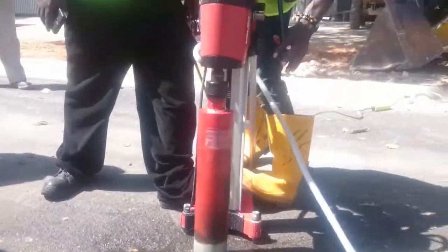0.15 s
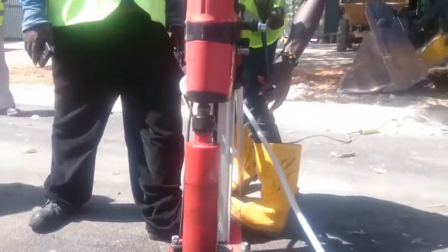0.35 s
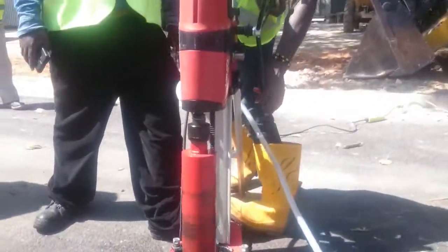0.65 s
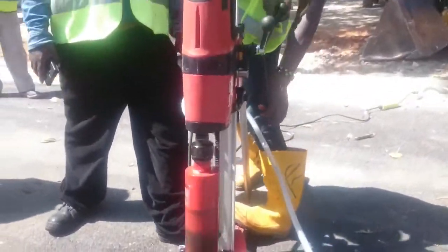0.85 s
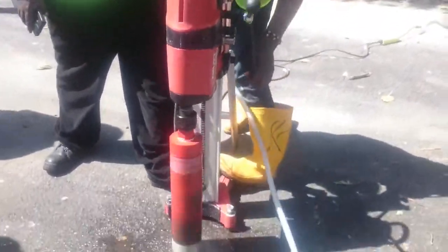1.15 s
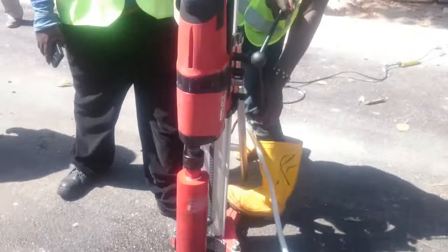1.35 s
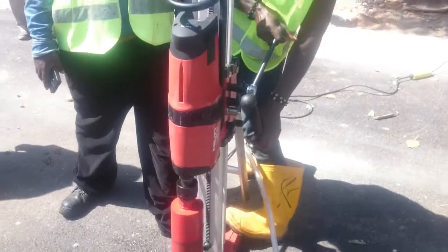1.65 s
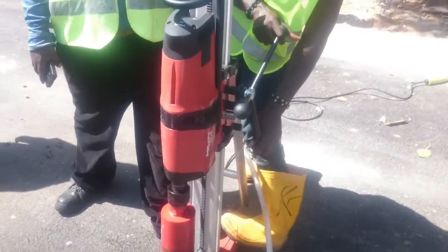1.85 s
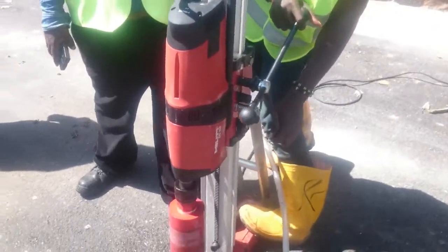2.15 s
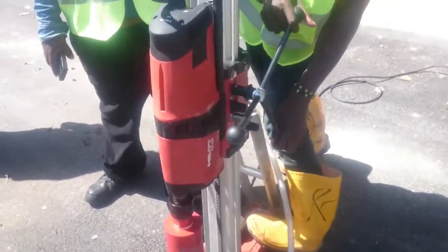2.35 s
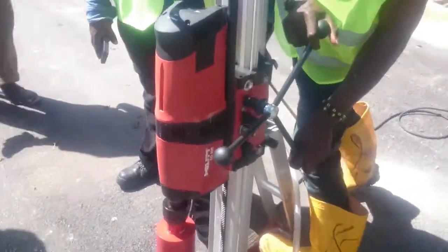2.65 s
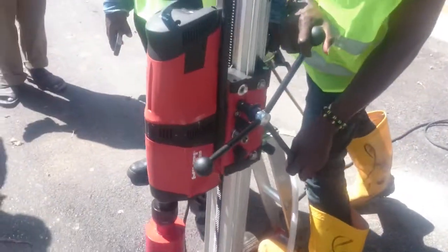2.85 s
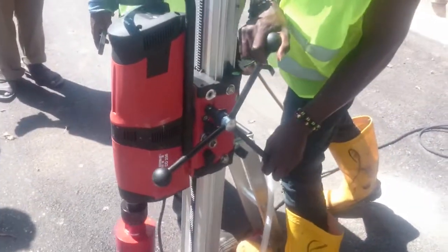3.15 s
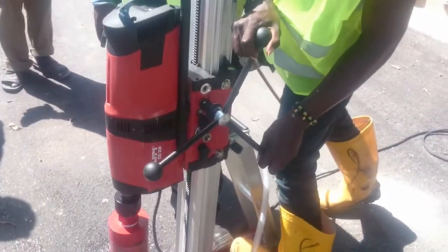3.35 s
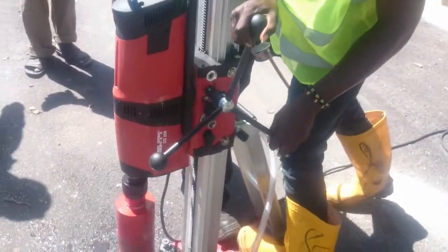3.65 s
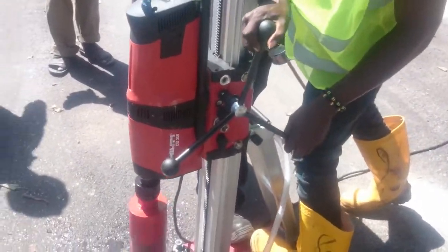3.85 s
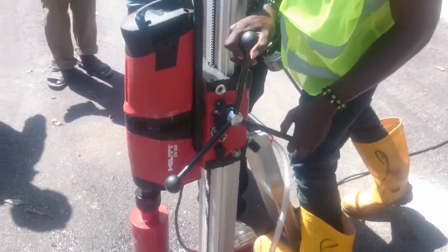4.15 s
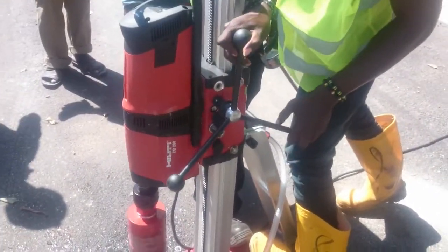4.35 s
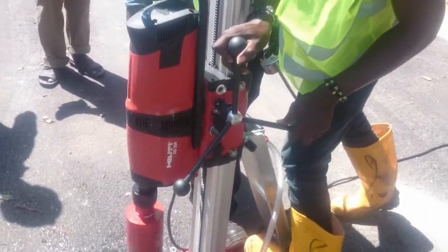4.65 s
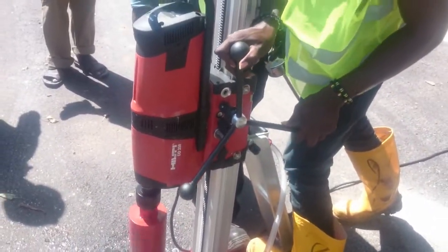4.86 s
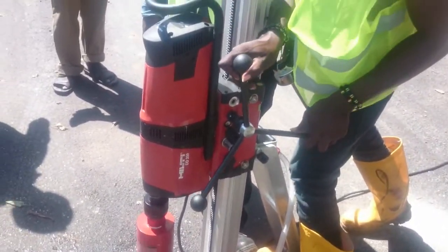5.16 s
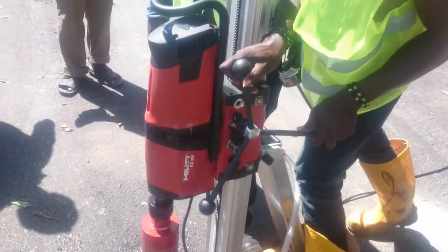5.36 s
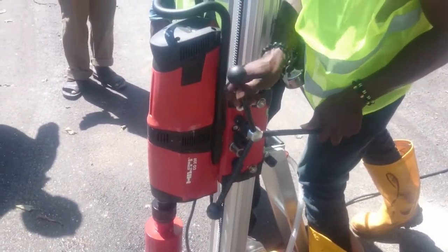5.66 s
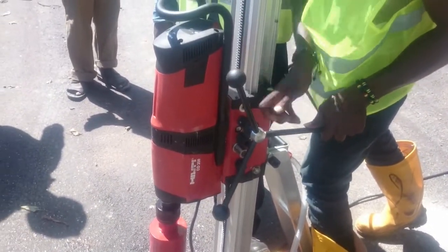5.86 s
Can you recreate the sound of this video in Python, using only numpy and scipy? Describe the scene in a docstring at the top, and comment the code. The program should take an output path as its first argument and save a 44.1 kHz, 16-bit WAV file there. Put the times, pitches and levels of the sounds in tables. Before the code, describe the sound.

A core drill whines steadily with hissing water spray, then bites into wet road with ringing metallic squeals and settles into harsh, gritty grinding.

```python
"""A diamond core drill on a stand cuts into a wet road, close to a moving listening point.
Shaft-locked tones make its motor, which sags under load; shaped noise makes its fan and the water spray.
At half a second the rim bites: noise-driven modes make the steel tube ring, weaker as it sinks in,
while wandering noise bands hiss in the cut and short pings are chips of stone. Wind rumbles low beneath."""
import sys
import numpy as np
from scipy import signal
from scipy.fft import rfft, irfft
from scipy.io import wavfile
from scipy.ndimage import map_coordinates

SR = 44100
rng = np.random.default_rng(int(sys.argv[2]) if len(sys.argv) > 2 else 0)


def int16_out(signal):
    """Quantize to a 16-bit WAV file."""
    q = np.round(np.clip(np.atleast_2d(signal).T, -1, 1) * 32767)
    wavfile.write(sys.argv[1], SR, q.astype(np.int16))


N = 265041
TIME = np.arange(N) / SR
FREQS = np.fft.rfftfreq(N, 1 / SR)
PORT_LAG_S = 12 / 44100  # default delay of the right microphone port
BITE_S, BITE_LENGTH_S, SEATED_S = 0.561, 0.063, 0.99  # rim meets the road; rim fully seated


def amp(db):
    """Decibels to gain."""
    return 10 ** (np.asarray(db) / 20)


def evened(x):
    """Scales to rms 1."""
    return x / np.sqrt(np.mean(abs(x) ** 2) + 1e-20)


def curves(rows):
    """Every column of a time table at every sample."""
    s, *columns = np.transpose(rows)
    return [np.interp(TIME, s, c) for c in columns]


def read(points):
    """A spectrum table at every frequency, interpolated over log frequency."""
    hz, value = np.transpose(points)
    return np.interp(np.log(FREQS + 1), np.log(hz + 1), value)


def panned(pan_db):
    """Left and right gains for a level difference, left minus right."""
    return amp(np.array([[.5], [-.5]]) * pan_db)


def bump(s, length_s):
    """Gaussian of height 1 centred on a moment; the length is two standard deviations."""
    return np.exp(-2 * ((TIME - s) / length_s) ** 2)


def swell(s, length_s):
    """A burst of height 1 with quick rise, hold and quick fall; the length is at half height."""
    return np.exp(-.7 * (2 * (TIME - s) / length_s) ** 4)


def ramp(start_s, end_s):
    """Goes from 0 to 1 between two moments."""
    return np.interp(TIME, [start_s, end_s], [0, 1])


def wander(hz):
    """Slow random signal of rms 1, rolled off above the given rate."""
    size, per_s = 8192, 1000
    rolloff = 1 + (np.fft.rfftfreq(size, 1 / per_s) / hz) ** 4
    slow = irfft(rfft(rng.standard_normal(size)) / rolloff)
    return evened(np.interp(TIME, np.arange(size) / per_s, slow))


def drifting(x, share, hz):
    """Shifts the pitch of a whole sound by a wandering share (rms), by uneven playback."""
    at = np.arange(N) + np.cumsum(share * wander(hz))
    return np.array([map_coordinates(port, [at], order=3, mode="mirror") for port in x])


def humps(resonances):
    """Left and right power spectra of a set of broad resonances."""
    power = 0
    for hz, width_hz, db, pan_db in resonances:
        shape = 1 / (1 + ((FREQS - hz) / (.777 * width_hz)) ** 2) ** 2
        power = power + (amp(db) * panned(pan_db)) ** 2 * shape
    return power


def grit(per_s, spread_db):
    """Random impacts of uneven size, rms 1."""
    hits = rng.random(N) < per_s / SR
    size = rng.uniform(-1, 1, N) * amp(spread_db * np.minimum(rng.exponential(1, N), 3))
    return evened(hits * size)


# Likeness of noise at the two microphone ports. Each row: frequency in Hz, likeness from 0 to 1.
PORT_LIKENESS = [(60, 0.66), (300, 0.85), (600, 1), (1100, 0.57), (2000, 0.26), (5000, 0.041),
                 (15000, 0.12)]


def rush(power, drive=0):
    """Turbulence, with any impacts in it, coloured by a power spectrum; it reaches the left port first."""
    a, b = rfft(evened(rng.standard_normal((2, N)) + drive))
    same = np.clip(read(PORT_LIKENESS), 0, 1)
    right = same * a + np.sqrt(1 - same ** 2) * b
    right = right * np.exp(-2j * np.pi * FREQS * PORT_LAG_S)
    return irfft(np.array([a, right]) * np.sqrt(power * SR / 2), N)


def tone(hz, db, pan_db, flutter, lag_s=PORT_LAG_S):
    """A line on a speed curve; reflections off the road and the crew make it flutter at each port."""
    turns = np.cumsum(hz) / SR - np.array([[0], [lag_s]]) * hz
    scatter = np.array([wander(28) + 1j * wander(22) for _ in range(2)])
    line = ((1 + flutter * scatter) * np.exp(2j * np.pi * turns)).real
    return np.sqrt(2) * amp(db) * panned(pan_db) * line


# Motor tones. Each row: time in seconds, then gear mesh (before a trim), fan blades, blade octave in dB.
TONE_LEVELS = [(0, -61, -55, -62), (1.05, -64, -57, -60), (1.3, -51.5, -58, -55), (2.05, -53.5, -54, -56),
               (2.25, -55.5, -56, -45.5), (2.7, -53, -54, -53), (3.4, -52.5, -56, -58),
               (3.7, -53, -52.5, -58), (4.02, -61, -58, -54), (4.35, -50, -47, -49),
               (4.68, -52.5, -43.7, -49), (5.1, -50.5, -49.5, -48), (5.75, -51, -47, -47),
               (6.01, -60, -55, -48)]
# Bursts of commutator whine. Each row: centre in seconds, length in seconds, level in dB.
WHINE_BURSTS = [(.33, .27, -38.3), (.59, .05, -42), (.855, .04, -39), (.945, .04, -42), (1.1, .05, -43),
                (1.21, .08, -38.5), (1.4, .11, -37), (1.68, .24, -39.3), (1.9, .11, -41.5),
                (2.03, .1, -39.5), (2.23, .22, -37.3), (2.5, .2, -40), (2.66, .08, -45), (3, .06, -41),
                (3.18, .07, -40), (3.7, .34, -46), (4.12, .12, -38), (4.44, .16, -37.5), (4.77, .2, -39),
                (4.93, .1, -45), (5.19, .15, -42.5), (5.36, .14, -45.5), (5.65, .05, -46),
                (5.8, .08, -39.5), (5.885, .04, -39.5)]
GEAR_ORDER, BLADES, COMMUTATOR_BARS = 3.047, 8, 30  # cycles per turn
WHINE_BED_DB = -50


def motor(speed):
    """Gear mesh, fan blades and commutator, locked to the shaft; the gear tone wavers as the load comes on."""
    gear_db, blade_db, octave_db = curves(TONE_LEVELS)
    waver_hz = 26 * bump(1.65, .85) * wander(14)
    bursts = sum((amp(db) * swell(s, length_s)) ** 2 for s, length_s, db in WHINE_BURSTS)
    whine_db = 10 * np.log10(amp(WHINE_BED_DB) ** 2 + bursts)
    gear = tone(GEAR_ORDER * speed + waver_hz, gear_db + .8, pan_db=-1.5, flutter=.18, lag_s=.00031)
    blades = tone(BLADES * speed, blade_db, pan_db=0, flutter=.08, lag_s=.0004)
    octave = tone(2 * BLADES * speed, octave_db, pan_db=17, flutter=.18)
    whine = tone(COMMUTATOR_BARS * speed, whine_db, pan_db=10.5, flutter=.22, lag_s=.000278)
    return gear + blades + octave + whine


# Air rush before the nearness gain. Each row: frequency in Hz, density in dB per Hz.
FAN_SPECTRUM = [(100, -115), (190, -96.5), (260, -97), (380, -86), (540, -85), (800, -75.5), (1100, -77.5),
                (1350, -75.5), (2100, -73), (3000, -79), (4000, -78), (6000, -105), (16000, -125)]
# Resonances of housing, gearcase and air vents; gains follow for housing and vents.
# Each row: frequency in Hz, width in Hz, density in dB per Hz, left minus right in dB.
HOUSING_MODES = [(663, 160, -76.5, -2.5), (919, 40, -73, 1), (1195, 380, -80, -1.5),
                 (1605, 115, -73.5, -7.5), (2380, 750, -75, -8), (2570, 69, -87.5, -20),
                 (3170, 93, -80, -16), (3460, 210, -76, -10.5)]
GEARCASE_MODES = [(675, 90, -78, 0), (1990, 200, -77, -2), (2730, 180, -75, -12), (3120, 260, -74, -12)]
VENT_MODES = [(551, 113, -77.5, -0.5), (1062, 30, -69.5, -1), (1164, 190, -74.5, -0.5), (1500, 160, -82, 8),
              (3900, 180, -76, 13), (4930, 94, -72.5, 15), (7980, 180, -76, 14), (8410, 230, -73, 13),
              (10820, 390, -72.5, 16)]
DRONE_HZ, DRONE_RISE_HZ_PER_S, DRONE_ENTRY_S = 217.7, 15, 1.66


def fan(near_db):
    """Cooling air excites housing, vents and gearcase; a hollow drone of narrow noise rises in pitch."""
    air_db = 0.5 + 0.67 * near_db
    vent_db = .5 + 7 * near_db
    drone_db = -67.0 + 0.64 * near_db - 12 * (TIME <= DRONE_ENTRY_S)  # steps up at its entry
    drone_hz = DRONE_HZ + DRONE_RISE_HZ_PER_S * TIME
    air = rush(amp(read(FAN_SPECTRUM)) ** 2 * panned(-4.5) ** 2 + humps(HOUSING_MODES)) * amp(air_db)
    vents = rush(humps(VENT_MODES)) * amp(vent_db)
    gearcase = rush(humps(GEARCASE_MODES)) * bump(2, 1.3)  # the listening point passes it
    carrier = np.exp(2j * np.pi * np.cumsum(drone_hz) / SR)
    drone = ((wander(35) + 1j * wander(32)) * carrier).real
    return air + gearcase + vents + drone * amp(drone_db) * panned(-1.5)


# Spray before its level curve. Each row: frequency in Hz, density in dB per Hz.
SPRAY_SPECTRUM = [(500, -110), (2500, -78), (4000, -78), (5700, -76), (7500, -74), (9300, -76),
                  (10300, -80), (11400, -84.5), (12400, -79), (13000, -87), (13500, -95), (13900, -86),
                  (15000, -91), (15800, -101)]
# Spray balance. Each row: frequency in Hz, left minus right in dB.
SPRAY_BALANCE = [(4000, 7), (9500, 0.5), (12000, -1), (15000, -7.5)]
# Resonances of spray off the free bit, before its level curve.
# Each row: frequency in Hz, width in Hz, density in dB per Hz, left minus right in dB.
FREE_SPRAY_MODES = [(470, 102, -74.5, -2), (1180, 240, -70.5, -0.5), (1590, 130, -75, 9),
                    (3310, 460, -69.5, -4.5), (4120, 360, -69, -1), (6380, 260, -67.5, 8.5),
                    (10400, 870, -72, 19), (12800, 1600, -79, -1), (15200, 1800, -87, -3)]
FREE_DB, FREE_FALL_DB_PER_S = -1.5, 23


def water(near_db):
    """Droplets fizz off the spinning bit, stronger before the rim seats; the free bit's spray dies at the bite."""
    unseated = 1 - ramp(SEATED_S - .12, SEATED_S)
    spray_db = 0.18 + 0.4 * near_db + 2.8 * unseated + 2.0 * bump(BITE_S, BITE_LENGTH_S)
    free_db = FREE_DB - FREE_FALL_DB_PER_S * np.maximum(TIME - BITE_S + BITE_LENGTH_S, 0)
    drops = .3 * grit(3000, spread_db=1.0)
    spray = rush((amp(read(SPRAY_SPECTRUM)) * panned(read(SPRAY_BALANCE))) ** 2, drops)
    return spray * amp(spray_db) + rush(humps(FREE_SPRAY_MODES)) * amp(free_db)


# Rumble before the wind's level. Each row: frequency in Hz, density in dB per Hz.
RUMBLE_SPECTRUM = [(15, -120), (30, -114), (45, -92), (75, -86), (120, -93.5), (200, -100), (400, -110),
                   (1500, -140)]
# Gusts on the microphone. Each row: centre in seconds, length in seconds, dB over the steady rumble.
WIND_GUSTS = [(.25, 0.64, 5), (2.5, 0.21, 7), (4.15, 0.23, 5), (5.2, 1, 6.5)]


def wind():
    """Turbulence at the microphone: a faint, uneven low rumble with a few gusts."""
    gusts = sum(amp(db) * bump(s, length_s) for s, length_s, db in WIND_GUSTS)
    rumble = rush((amp(read(RUMBLE_SPECTRUM)) * panned(-6.5)) ** 2)
    return rumble * np.hypot(1, gusts) * amp(-6.0 + 1.8 * wander(9.2))


# Fixed notches in the sound of air, spray and cut, as from a short echo.
# Each row: centre in Hz, width in Hz, gain in dB.
ECHO_NOTCHES = [(385, 40, -4.5), (795, 70, -2.5), (1035, 40, -6), (1385, 130, -3), (1765, 130, -4),
                (2460, 130, -2), (4290, 160, -2.5), (5630, 150, -3), (8660, 260, -2.5)]


def notched(x):
    """Cuts fixed notches into the sound of air, spray and cut, as from a short echo."""
    db = sum(depth_db * np.exp(-2 * ((FREQS - hz) / width_hz) ** 2)
             for hz, width_hz, depth_db in ECHO_NOTCHES)
    return irfft(rfft(x) * amp(db), N)


def reflections(x):
    """Road, stand and the crew's legs return short echoes; delays drift as the listening point moves."""
    def echo(port):
        delay_s = rng.uniform(.003, .01) * (1 + .06 * wander(.3))
        return np.interp(TIME - delay_s, TIME, port, left=0)
    share = .17
    wet = np.array([port + share * sum(echo(port) for _ in range(4)) for port in x])
    return wet / np.sqrt(1 + 2 * share ** 2)


# Resonances of the cut, before its level curves.
# Each row: frequency in Hz, width in Hz, density in dB per Hz, left minus right in dB.
CUT_MODES = [(4120, 630, -75.5, 17.8), (4510, 270, -74.5, 20.7), (4914, 320, -68, 14.5),
             (5340, 370, -72, 17.6), (6050, 620, -78.5, 20.1), (10060, 1650, -81.5, 24.7)]
CUT_DRIFT_SHARE, CUT_DRIFT_HZ = .014, 14


def grinding(contact, near_db, rasp):
    """Diamonds scrape wet stone; each resonance of the cut catches, eases and shifts in pitch on its own."""
    db = .4 - 1.9 * (1 - contact) + 0.24 * near_db + 2.7 * bump(BITE_S, BITE_LENGTH_S)
    grains = .25 * grit(2500, spread_db=1.5)
    scrape = 0
    for mode in CUT_MODES:
        band = drifting(rush(humps([mode]), grains), CUT_DRIFT_SHARE, CUT_DRIFT_HZ)
        scrape = scrape + band * amp(wander(30))
    return scrape * amp(db) * rasp


CHIPS_PER_S, CHIP_RANGE_HZ, CHIP_DECAY_S, CHIP_DB = 150, (1500, 5600), .0013, -50


def chips(contact, count=24):
    """Bits of stone snap off under the rim as very short pings of many pitches; high ones are strongest."""
    t = np.arange(0, 10 * CHIP_DECAY_S, 1 / SR)
    out = np.zeros((2, N))
    for hz in np.geomspace(*CHIP_RANGE_HZ, count):
        phase = 2 * np.pi * hz * (t - np.array([[0], [PORT_LAG_S]]))
        ping = hz * t * np.exp(-t / CHIP_DECAY_S) * np.sin(phase)
        hits = grit(CHIPS_PER_S / count, spread_db=4.0)[None]
        out += signal.oaconvolve(hits, ping, axes=1)[:, :N]
    return evened(out) * contact * amp(CHIP_DB) * panned(14.6)


RING_SWELL_DB, RING_SWELL_HZ = 2, 30  # each mode swells as the contact point wanders


def ringing(width_hz):
    """The swing of one mode fed by grit, rms 1; rubbing in the cut caps it."""
    r = np.exp(-np.pi * width_hz / SR)
    hits = grit(1500, spread_db=2.0) + 1j * grit(1500, spread_db=2.0)
    hits = hits * amp(RING_SWELL_DB * wander(RING_SWELL_HZ))
    ring = evened(signal.lfilter([1], np.poly([r, r ** 3]), hits))  # second pole steepens the skirts
    return evened(ring / np.sqrt(1 + 0.25 * abs(ring) ** 2))


# Modes of the steel tube. Each row: frequency in Hz (before the grip stiffens it), width in Hz,
# relative level in dB, left minus right in dB, lag of the right port in seconds.
TUBE_MODES = [(915, 24, -21, -2, .00027), (2085, 24, -2.5, -6.5, .0002), (2660, 24, -8, -1, .00014),
              (3645, 46, -1.5, 6, .00031), (3745, 45, -8, 3, .00031), (3918, 26, -3.5, 4, .00032),
              (4545, 60, -4, 13, .00027), (4850, 40, -6, 13, .00027), (5130, 50, -10, 13, .00027),
              (5310, 45, -6.5, 11, .00027)]
# Catches of the rim, each singing on the nearest tube mode.
# Each row: centre in seconds, length in seconds, mode in Hz, level in dB.
RIM_CATCHES = [(.548, .04, 5130, -37), (.558, .028, 3918, -38.5), (.615, .03, 2085, -35),
               (.62, .06, 3918, -36.5), (.63, .08, 2660, -38.5), (.712, .032, 3645, -30.5),
               (.73, .06, 2660, -40), (.753, .026, 4545, -35.5), (.78, .3, 915, -50.5),
               (.857, .04, 4545, -37), (.897, .028, 3645, -34), (.95, .025, 2085, -40),
               (.978, .022, 3645, -35.5), (1.02, .07, 2660, -42), (1.013, .04, 5310, -36.5),
               (1.035, .014, 4545, -37), (1.09, .075, 2085, -34), (1.182, .016, 2085, -33),
               (1.19, .025, 3645, -38), (1.235, .055, 2085, -37), (1.277, .023, 4850, -36),
               (1.34, .022, 2085, -37), (1.375, .022, 2660, -41), (1.365, .018, 3918, -37.5),
               (1.46, .022, 2660, -41.5), (1.48, .03, 3918, -41), (1.585, .04, 4850, -37.5),
               (1.6, .08, 3745, -42), (2, .16, 3745, -42), (2.17, .012, 3645, -37), (2.82, .09, 4850, -40)]
BITE_RING_DB, RING_DB, DAMPING_DB_PER_S = -39, -40, 3.8
JOLT_HZ = 3000  # the bite jolts only modes above this
GRIP_S, GRIP_RISE_S, STIFFENING_SHARE = 1.1, .35, .01  # the cut grips the tube and raises its modes
GRIP_JITTER_SHARE, GRIP_JITTER_HZ = .005, 45
LIKENESS_FREE, LIKENESS_GRIPPED = .82, .3  # of the ring at the two ports
CATCH_WAVER_RAD = .6


def tube(contact, rasp):
    """Grit under the rim keeps the steel tube's modes ringing, weaker and more blurred as it sinks in."""
    mode_hz = np.array(TUBE_MODES)[:, 0]
    damped_db = RING_DB - DAMPING_DB_PER_S * np.maximum(TIME - BITE_S, 0)
    rubbing = contact * rasp * amp(damped_db)
    bite = amp(BITE_RING_DB) * bump(BITE_S, BITE_LENGTH_S)
    grip = 1 - np.exp(-np.maximum(TIME - GRIP_S, 0) / GRIP_RISE_S)
    same = np.interp(grip, [0, 1], [LIKENESS_FREE, LIKENESS_GRIPPED])
    out = np.zeros((2, N))
    for k, (hz, width_hz, mode_db, pan_db, lag_s) in enumerate(TUBE_MODES):
        squeals = sum(amp(db) * bump(s, length_s) for s, length_s, catch_hz, db in RIM_CATCHES
                      if abs(mode_hz - catch_hz).argmin() == k)
        level = amp(mode_db) * np.hypot(rubbing, bite * (hz > JOLT_HZ))
        pitch_hz = hz * (1 + grip * (STIFFENING_SHARE + GRIP_JITTER_SHARE * wander(GRIP_JITTER_HZ)))
        # a round tube has twin modes; each port hears its own blend
        a, b = ringing(width_hz), ringing(width_hz)
        ring = np.array([a, same * a + np.sqrt(1 - same ** 2) * b]) * level
        # a catch sings as an almost pure tone
        ring = ring + squeals * np.exp(1j * CATCH_WAVER_RAD * wander(RING_SWELL_HZ))
        ports = np.exp(-2j * np.pi * hz * np.array([[0], [lag_s]]))
        carrier = np.exp(2j * np.pi * np.cumsum(pitch_hz) / SR)
        out += np.sqrt(2) * panned(pan_db) * (ring * ports * carrier).real
    return out


# Motor speed, sagging as the feed lever is pressed. Each row: time in seconds, speed in turns per second.
MOTOR_SPEED = [(0, 334.4), (.5, 333.2), (.9, 328.2), (1.2, 331), (1.47, 325), (1.75, 326.8), (2.05, 325.2),
               (2.25, 326.6), (2.45, 330), (2.7, 331.5), (3.6, 330.4), (4.03, 329.5), (4.12, 325),
               (4.22, 322.3), (4.4, 321.3), (4.65, 323.3), (5.1, 323.9), (5.87, 322.9), (6.01, 331)]
# The listening point swings away, then closes in on the motor.
# Each row: time in seconds, nearness in dB (each source scales it).
NEARNESS = [(0, -3), (.55, -5), (.92, -8.5), (1.35, -3), (2.2, -1.1), (3.1, 0), (6.01, 0.07)]
TURNS_PER_RUB, RASP_DB = 12.6, .9  # the rim rubs harder once in so many motor turns


def scene():
    """The drill, its cut and their echoes over a low outdoor rumble."""
    near_db = curves(NEARNESS)[0]
    speed = curves(MOTOR_SPEED)[0] * (1 + .0002 * wander(12))
    contact = ramp(BITE_S - BITE_LENGTH_S, BITE_S)
    rub_phase = 2 * np.pi * np.cumsum(speed / TURNS_PER_RUB) / SR + .5 * wander(1.5)
    rub_depth_db = RASP_DB * contact * (0.5 + .5 * wander(1.4))
    rasp = amp(rub_depth_db * np.sin(rub_phase))
    cutting = grinding(contact, near_db, rasp) + chips(contact)
    echoed = reflections(notched(fan(near_db) + water(near_db) + cutting))
    return motor(speed) + echoed + tube(contact, rasp) + wind()


def record(dry):
    """Band limit: a steep linear-phase low-pass."""
    edge_hz = 15750
    lowpass = signal.firwin(511, edge_hz, window=("kaiser", 9), fs=SR)
    return signal.oaconvolve(dry, lowpass[None], "same")


dry = scene()
out = record(dry)
int16_out(out)
```